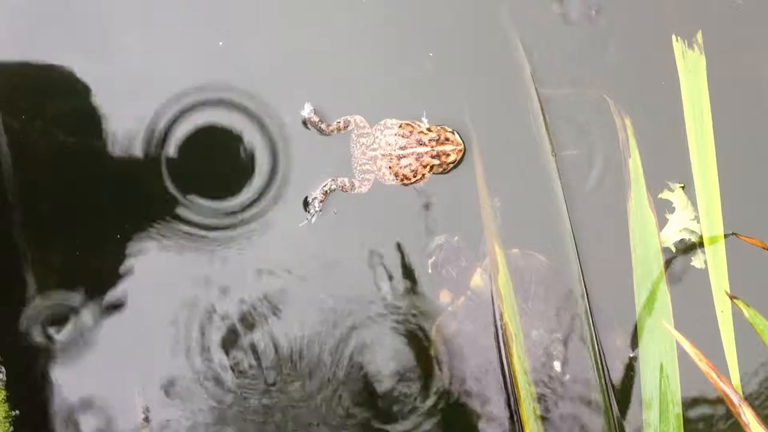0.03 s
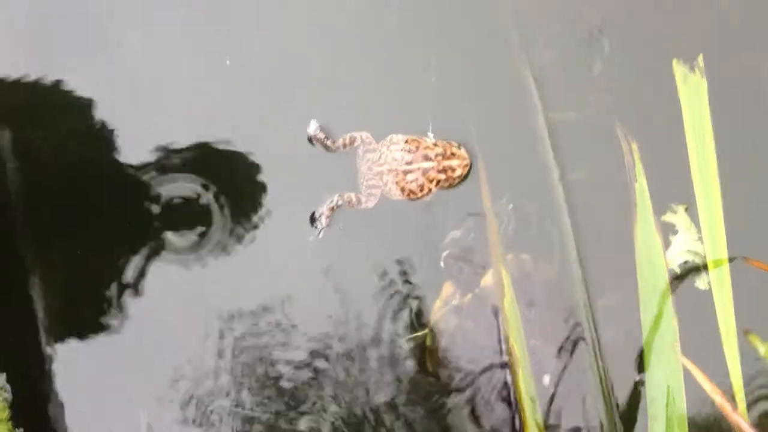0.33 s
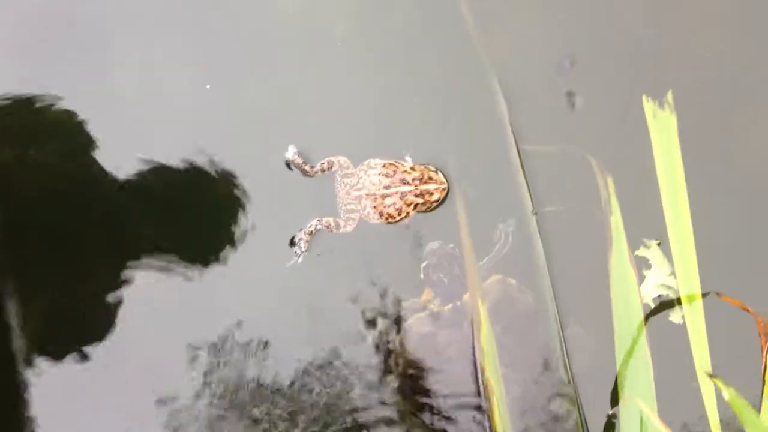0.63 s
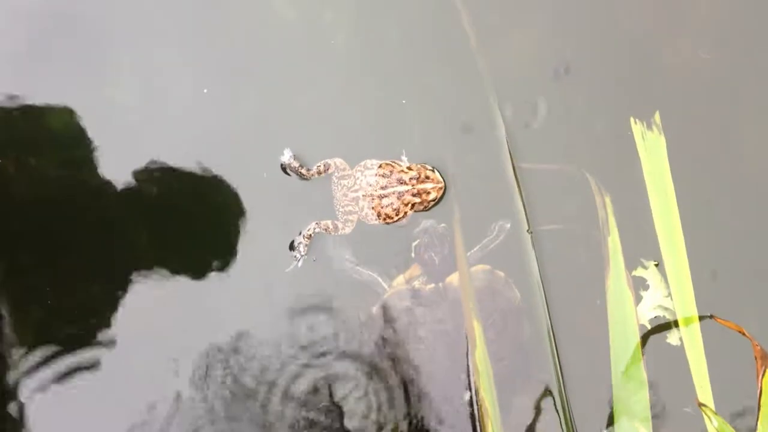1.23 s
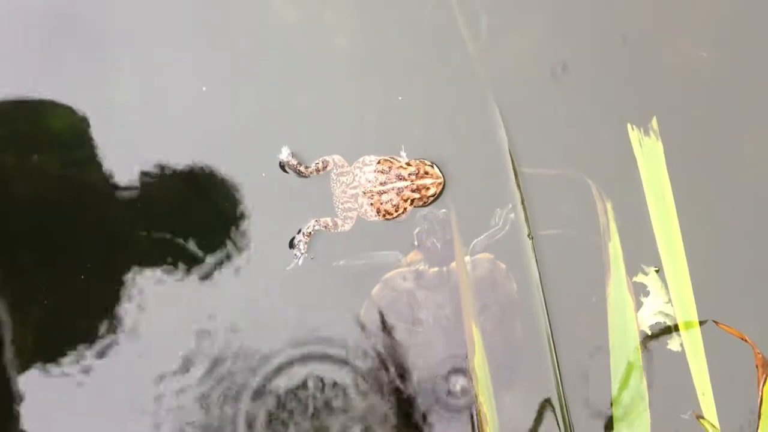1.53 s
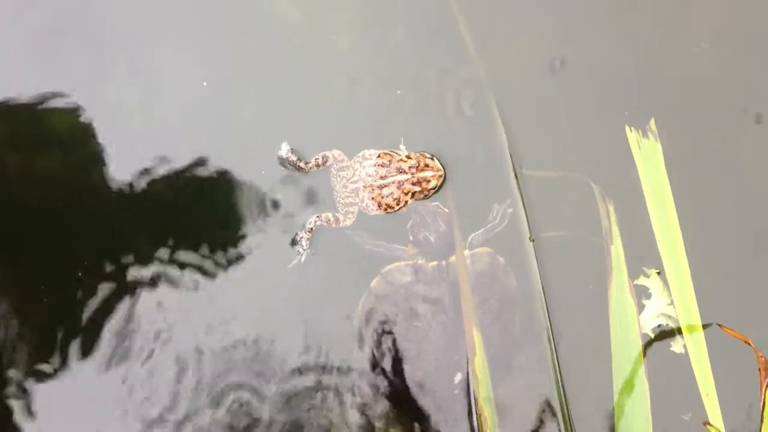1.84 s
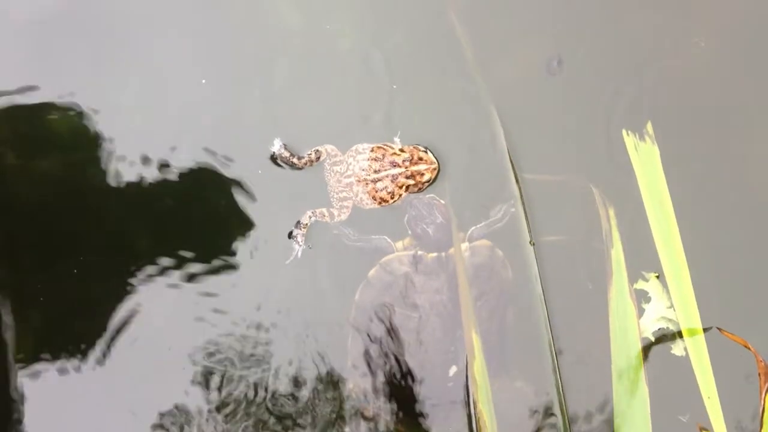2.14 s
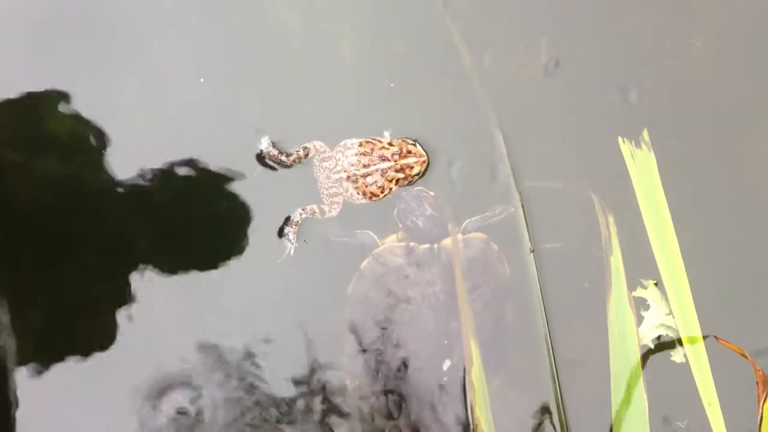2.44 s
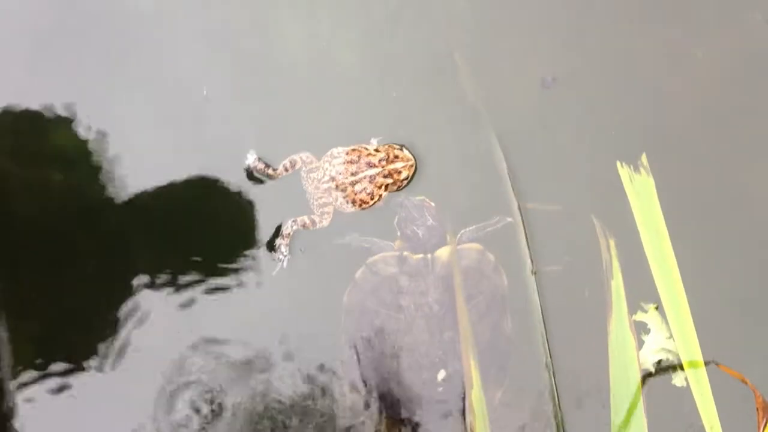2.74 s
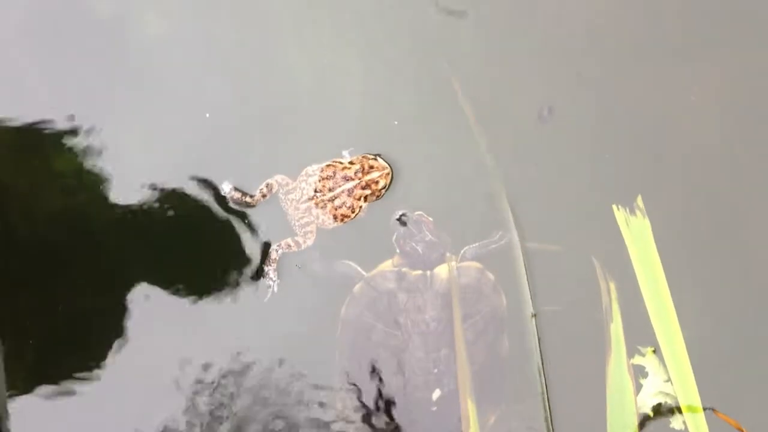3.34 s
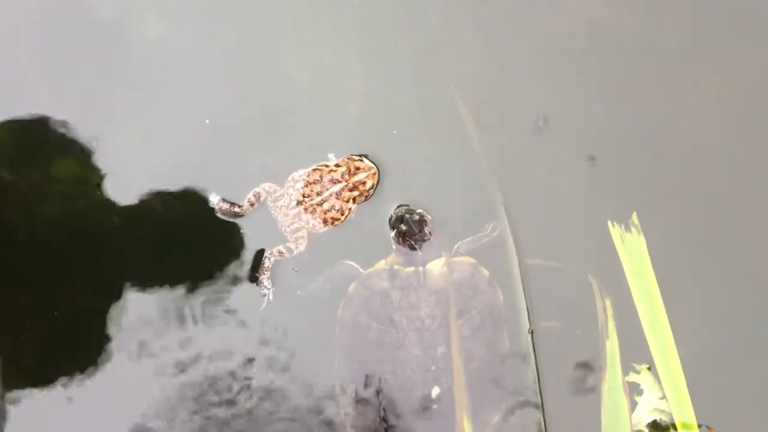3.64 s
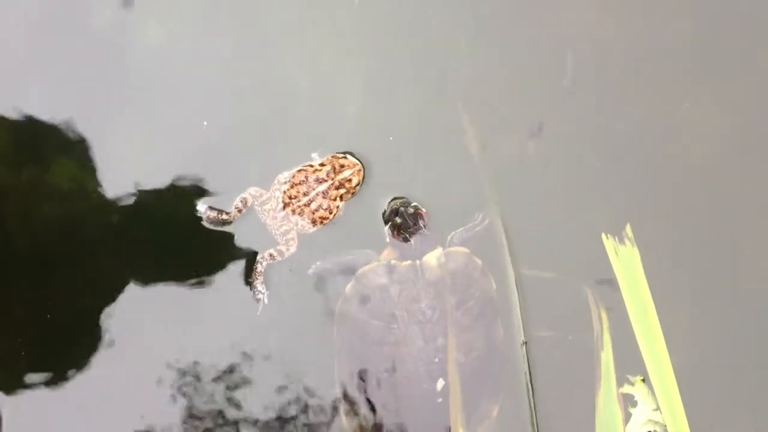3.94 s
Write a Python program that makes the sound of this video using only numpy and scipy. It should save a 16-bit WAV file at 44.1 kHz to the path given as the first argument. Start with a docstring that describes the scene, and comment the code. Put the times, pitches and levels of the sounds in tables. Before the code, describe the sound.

A toad trills loudly nearby, then fainter toads carry on over trickling pond water.

```python
"""A toad trills close by at a garden pond: about fifty short arched chirps a second, which slow down
and turn raspy as the call runs out. Each chirp is one puff of air through the vocal folds, with a dull
after-ring and two early echoes. One farther toad trills throughout and two more join as the near one
stops, over trickling water, a few bubbling drips and splashes, and a low rumble with a faint hum."""
import sys
import numpy as np
from scipy import signal
from scipy.fft import rfft, irfft
from scipy.io import wavfile

SR = 44100
rng = np.random.default_rng(int(sys.argv[2]) if len(sys.argv) > 2 else 0)


def dump_mix(stems):
    """Bounce the given channels to the path in sys.argv[1] as a 16-bit WAV at rate SR."""
    frames = np.atleast_2d(stems).T  # one column per channel
    limited = np.clip(frames, -1, 1)  # hard clip at full scale
    pcm = np.round(limited * 32767).astype(np.int16)
    wavfile.write(sys.argv[1], SR, pcm)


N = 176400
T = np.arange(N) / SR
CHIRP_T = np.arange(-SR // 100, SR // 80) / SR  # seconds from the top of a chirp's pitch arch

# pace of the near trill (time [s], rate [chirps/s])
TRILL_RATE = [(0.1, 58.308), (0.16, 52.645), (0.45, 53.078), (0.7, 51.947), (1.1, 52.308), (1.3, 50.188),
              (1.45, 51.746), (1.8, 51.149), (2.0, 48.255), (2.1, 46.104), (2.19, 41.625)]
# the toad's effort (time [s], level [dB], top pitch [Hz])
CALL_EFFORT = [(.1, -13, 1995), (.5, -13.5, 1992), (.9, -13.5, 1990), (1.3, -14.5, 1992), (1.8, -14, 1984),
               (2.0, -14.5, 1985), (2.19, -14.5, 1962)]
# chirp length as the toad tires (time [s], stretch [x])
CHIRP_STRETCH = [(.1, 0.92), (1.7, 1.14), (2.19, 1.09)]
# clean tone (pitch multiple [x], level [dB], peak time [s], rise [s], fall [s], flatness [exponent])
CLEAN_PARTIALS = [(1, -5.5, .0004, 0.0041, .0042, 6.4), (1, -6, -.0004, .0018, 0.0018, 1.7),
                  (1, -20, 0.00526, 0.0017, 0.0041, 0.69), (2, -17.5, -0.00057, 0.0039, 0.0065, 18),
                  (3, -22, .0054, 0.0013, .0014, 2.18), (3, -28, -0.0023, 0.00034, 0.00081, 1.1)]
# half-pitch rasp (pitch multiple [x], level [dB], peak time [s], rise [s], fall [s], flatness [exponent])
RASP_PARTIALS = [(.5, -19, 0.0015, 0.0033, 0.0025, 2.15), (1.5, -20, 0.003, 0.0012, 0.0054, 0.69),
                 (2.5, -14.5, .001, 0.0017, 0.0032, 1.7)]
# fader ride on the rasp (time [s], gain [dB])
RASP_RIDE = [(.1, -18), (.38, -9.5), (.55, -21), (.78, -9), (1.1, -16), (1.3, -3), (1.48, -12), (1.6, -5.5),
             (1.78, -7.5), (1.95, -2), (2.1, 1.5), (2.19, 1.5)]
# tone of the scrape that opens each chirp (frequency [Hz], relative level [dB])
SCRAPE_EQ = [(80, -72), (600, -20), (1050, -5.5), (1400, -17), (2000, -12), (2350, -7), (2700, -3.5),
             (3150, -19.5), (4300, -16), (4900, 2.5), (5500, -6.5), (6100, -34), (9000, -38)]


def near_toad(start_s=.0981, end_s=2.195):
    """Puffs through the vocal folds make a train of chirps, each with a scrape and a half-pitch rasp."""
    jitter_s, shimmer_db, pitch_wobble, rasp_spread_db = .00007, .25, .0032, .5
    scrape_db, scrape_at_s, scrape_width_s = -19, -.0019, .0026
    times = chirp_times(curve(TRILL_RATE, T)[0], start_s, end_s)
    voice, scrape_gate = np.zeros(N), np.zeros(N)
    for s, (late, loud, sharp, rough) in zip(times, rng.standard_normal((len(times), 4))):
        db, hz = curve(CALL_EFFORT, s)
        hz *= 1 + pitch_wobble * sharp
        t = CHIRP_T / curve(CHIRP_STRETCH, s)[0]
        rasp = amp(curve(RASP_RIDE, s)[0] + rasp_spread_db * rough)
        tone = chirp(t, hz, CLEAN_PARTIALS) + rasp * chirp(t, hz, RASP_PARTIALS)
        scrape_swell = np.exp(-((t - scrape_at_s) / scrape_width_s) ** 2)
        onset = s + CHIRP_T[0] + jitter_s * late
        add(voice, onset, amp(db + shimmer_db * loud) * tone)
        add(scrape_gate, onset, amp(db + scrape_db) * scrape_swell)
    return voice + colour(scrape_gate * rng.standard_normal(N), SCRAPE_EQ)


def chirp(t, top_hz, partials, arch=1):
    """One puff through the folds: the pitch arches around t = 0 while each partial swells and dies."""
    climb, sag, arch_s = .0898, .088, .004966
    droop = np.where(t < 0, climb, sag) * (t / arch_s) ** 2
    hz = top_hz * (1 - arch * np.minimum(droop, .18))
    lift = 1 + .023 * np.exp(-((t + .00054) / .0018) ** 2)  # the main tone pulls sharp where loudest
    out = np.zeros(len(t))
    for multiple, db, peak_s, rise_s, fall_s, flatness in partials:
        width_s = np.where(t < peak_s, rise_s, fall_s)
        swell = np.exp(-abs((t - peak_s) / width_s) ** flatness)
        cycles = np.cumsum(hz * (lift if multiple == 1 else multiple)) / SR
        out += amp(db) * swell * np.sin(2 * np.pi * cycles)
    return out


def chirp_times(rate, start_s, end_s):
    """A trill fires one chirp for each whole cycle of its rate curve."""
    count = np.cumsum(rate) / SR
    count -= np.interp(start_s, T, count)
    return np.interp(np.arange(np.interp(end_s, T, count)), count, T)


# a dull after-ring of each chirp, then two early echoes (delay [s], level [dB])
RING_AND_ECHO_TAPS = [(.0066, -19), (.0158, -15), (.0275, -24)]


def ring_and_echoes(voice):
    """The voice plus a dull after-ring, two early echoes, a soft dark tail and a shorter bright one."""
    dull = signal.sosfilt(signal.butter(2, 3020, fs=SR, output="sos"), voice)
    overtones = signal.sosfilt(signal.butter(4, 4500, "high", fs=SR, output="sos"), voice)
    out = voice + amp(-21) * garden_tail(dull, t60_s=.19)
    out += amp(-6) * garden_tail(overtones, t60_s=.15)
    for delay_s, db in RING_AND_ECHO_TAPS:
        add(out, delay_s, amp(db) * dull)
    return out


def garden_tail(x, t60_s):
    """Diffuse scatter from plants and banks, as loud as the sound that feeds it."""
    t = T[:SR // 2]
    decay = np.exp(-np.log(1000) * t / t60_s) * np.minimum(t / .0033, 1)
    wet = signal.fftconvolve(x, decay * rng.standard_normal(len(t)))[:N]
    return evened(wet) * np.std(x)


# the far chorus, the mid voice farthest off (time [s], level [dB], top pitch [Hz], rate [chirps/s])
LOW_CALL = [(0, -26, 2000, 55), (2.2, -40, 1994, 66), (2.6, -40.5, 1988, 48.4), (2.9, -40, 2008, 59),
            (3.4, -40.5, 1984, 57.5), (4, -42, 1987, 59)]
HIGH_CALL = [(2.35, -52.5, 2142, 60.1), (2.65, -43.5, 2148, 60.2), (2.95, -42.5, 2225, 58.77),
             (3.25, -39, 2240, 54.05), (3.55, -38.5, 2208, 57.25), (3.8, -38.5, 2170, 55.9),
             (4, -37.5, 2200, 57.95)]
MID_CALL = [(2.2, -49, 2074, 46), (2.7, -46, 2122, 50), (3.3, -48.5, 2124, 48.6), (4, -43, 2128, 45.4)]


def far_toad(call):
    """The same kind of trill, duller, less arched in pitch and smeared by distance."""
    jitter_s, shimmer_db, rise_s, fall_s = .00009, 1.1, .0053, .0049
    partials = [(1, 0, .0013, rise_s, fall_s, 2.44), (2, -26, 0, rise_s, fall_s, 2)]  # tone, faint octave
    times = chirp_times(curve(call, T)[2], call[0][0], T[-1])
    voice = np.zeros(N)
    for s, (late, loud) in zip(times, rng.standard_normal((len(times), 2))):
        db, hz, _ = curve(call, s)
        tone = chirp(CHIRP_T, hz, partials, arch=.42)
        add(voice, s + CHIRP_T[0] + jitter_s * late, amp(db + shimmer_db * loud) * tone)
    return voice + amp(-2.5) * garden_tail(voice, t60_s=.2)


# drops that trap a bubble (time [s], starting pitch [Hz], level [dB])
BUBBLE_CUES = [(2.315, 687, -47.5), (2.335, 793, -53), (2.772, 4800, -32), (2.775, 680, -49.5),
               (2.9, 916, -46), (2.967, 5200, -34), (3.0, 670, -63), (3.187, 5060, -37),
               (3.432, 5450, -34.5), (3.45, 805, -51), (3.489, 5270, -29.5), (3.57, 688, -52.5),
               (3.83, 5114, -33)]
# sharp splashes (time [s], level [dB])
SPLASH_CUES = [(0.164, -38), (.51, -49), (1.301, -39), (1.397, -43), (1.557, -36), (2.448, -43),
               (3.433, -41)]
# bright tone of a splash (frequency [Hz], relative level [dB])
SPLASH_EQ = [(1500, -47), (3500, 3), (5200, 10), (7000, 3), (9000, -11), (11500, -2.5), (15500, -7)]


def drips():
    """Larger drops: short splashes, and bubbles that glide up; small ones ring higher and more briefly."""
    rise_cycles, fade_cycles, glide_per_s, splash_fade_s = 3.3, 16, 2.76, .005
    t, bubbles, splashes = T[:SR // 8], np.zeros(N), np.zeros(N)
    for s, hz, db in BUBBLE_CUES:
        cycles = hz * (t + glide_per_s * t ** 2 / 2)
        swell = 2 * (1 - np.exp(-cycles / rise_cycles)) * np.exp(-cycles / fade_cycles)
        add(bubbles, s, amp(db) * swell * np.sin(2 * np.pi * cycles))
    for s, db in SPLASH_CUES:
        add(splashes, s, amp(db) * np.exp(-t / splash_fade_s) * rng.standard_normal(len(t)))
    return bubbles + colour(splashes, SPLASH_EQ)


# sparkle of the trickling water (frequency [Hz], relative level [dB])
TRICKLE_EQ = [(900, -28.5), (1600, -13), (2700, -7), (3500, -7), (4300, -2.5), (4900, 1.5), (5300, 3.5),
              (5800, -5), (7000, -12), (8500, -20.5), (9500, -21.5), (11300, -17), (13500, -21.5),
              (15500, -25)]


def trickle(hiss_db=-45, spatter_db=-49, hits_per_s=700, hit_fade_s=.00093):
    """Water falling into the pond: a wavering hiss and a spatter of tiny impacts."""
    hiss = amp(hiss_db + 1.2 * drift(below_hz=14)) * rng.standard_normal(N)
    hits = rng.random(N) < hits_per_s / SR
    accents = amp(3.5 * np.minimum(rng.exponential(1, N), 3.2))
    decays = signal.lfilter([1], [1, -np.exp(-1 / (hit_fade_s * SR))], hits * accents)
    spatter = amp(spatter_db) * evened(decays * rng.standard_normal(N))
    return colour(hiss + spatter, TRICKLE_EQ)


# low bed of outdoor noise (frequency [Hz], relative level [dB])
RUMBLE_EQ = [(18, -61), (30, -37), (54, -40), (67, -10.5), (86, -15), (114, 2.5), (193, 0.5), (232, 0.5),
             (534, -7), (674, -5.5), (720, -5.5), (1600, -8.5), (2080, -48), (3520, -120)]
# hum, perhaps the pond's pump (frequency [Hz], rms level [dB])
HUM_TONES = [(119.6, -67.5), (239.7, -66.5), (614, -68)]


def rumble(level_db=-50):
    """Low outdoor noise, wavering slightly, and a faint steady hum."""
    air = amp(level_db + drift(below_hz=16)) * evened(colour(rng.standard_normal(N), RUMBLE_EQ))
    hum = sum(amp(db) * np.sin(2 * np.pi * (hz * T + rng.random())) for hz, db in HUM_TONES)
    return air + np.sqrt(2) * hum


def amp(db):
    """Decibels to gain."""
    return 10 ** (np.asarray(db) / 20)


def evened(x):
    """Scales to rms 1."""
    return x / np.sqrt(np.mean(x ** 2) + 1e-20)


def curve(table, s):
    """Reads a table's automation lanes at the times s."""
    times, *columns = np.transpose(table)
    return [np.interp(s, times, column) for column in columns]


def add(mix, s, sound):
    """Mixes a sound in at time s."""
    part = mix[max(round(s * SR), 0):][:len(sound)]
    part += sound[:len(part)]


def colour(x, eq, size=8192):
    """Minimum-phase EQ; white noise keeps its power."""
    hz, db = np.transpose(eq)
    bin_hz = abs(np.fft.fftfreq(size, 1 / SR))
    gain = evened(amp(np.interp(np.log(bin_hz + 1), np.log(hz), db)))
    taps = np.fft.ifft(np.exp(signal.hilbert(np.log(gain)).conj())).real
    return signal.oaconvolve(x, taps[:size // 2])[:len(x)]


def drift(below_hz):
    """Slow random wander of rms 1."""
    slow = np.fft.rfftfreq(N, 1 / SR) < below_hz
    return evened(irfft(rfft(rng.standard_normal(N)) * slow, N))


def scene():
    """The near toad up front, the far chorus behind it and the pond around them, in mono."""
    chorus = far_toad(LOW_CALL) + far_toad(HIGH_CALL) + far_toad(MID_CALL)
    return (ring_and_echoes(near_toad()) + chorus + trickle() + drips() + rumble())[None]


def record(dry, open_s=.0835, high_cut_hz=15520):
    """The sound cuts in after a moment of silence; a steep high cut takes off the very top."""
    high_cut = signal.firwin(801, high_cut_hz, window=("kaiser", 9), fs=SR)
    return signal.oaconvolve(dry * (T >= open_s), high_cut[None], "same")


dry = scene()
out = record(dry)
dump_mix(out)
```